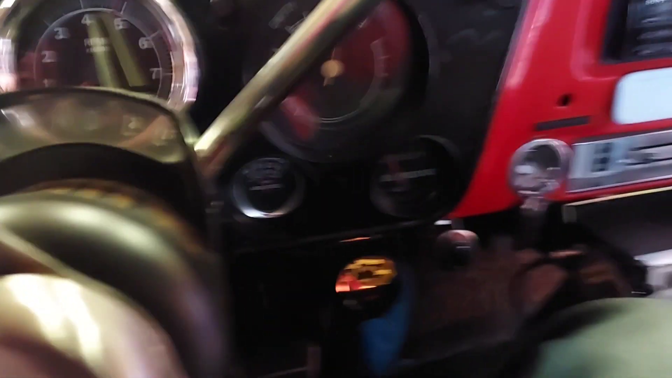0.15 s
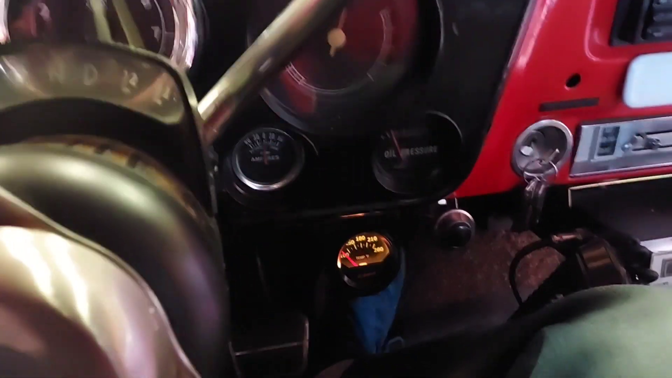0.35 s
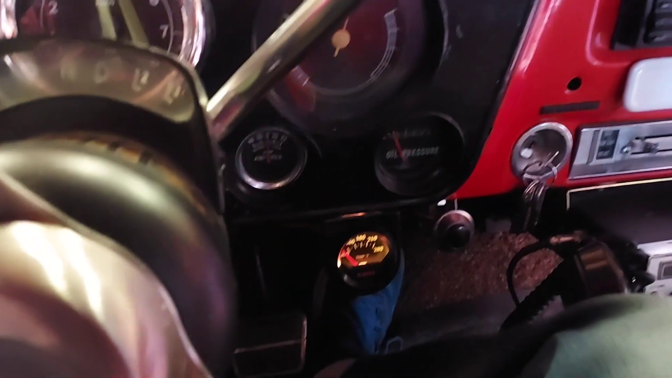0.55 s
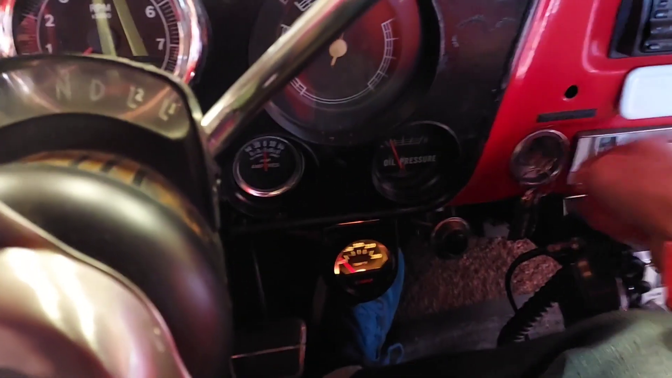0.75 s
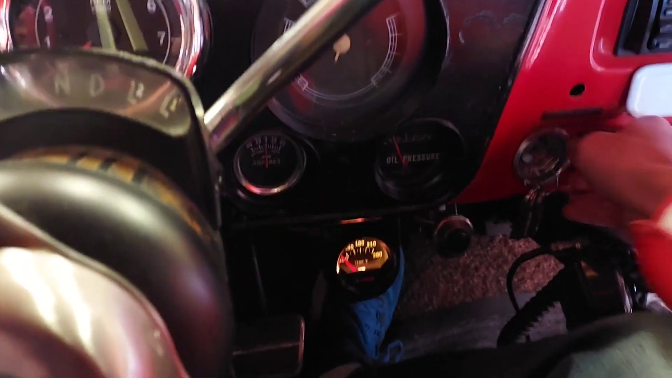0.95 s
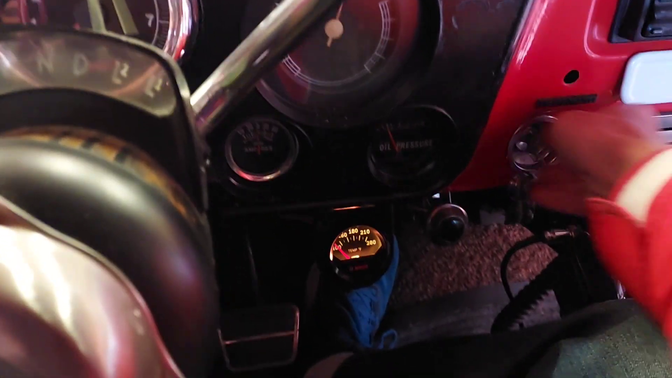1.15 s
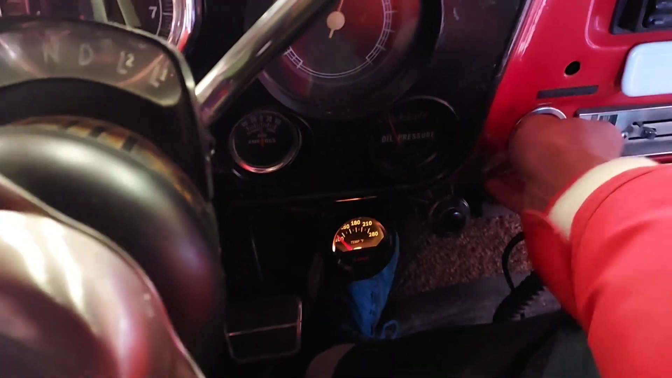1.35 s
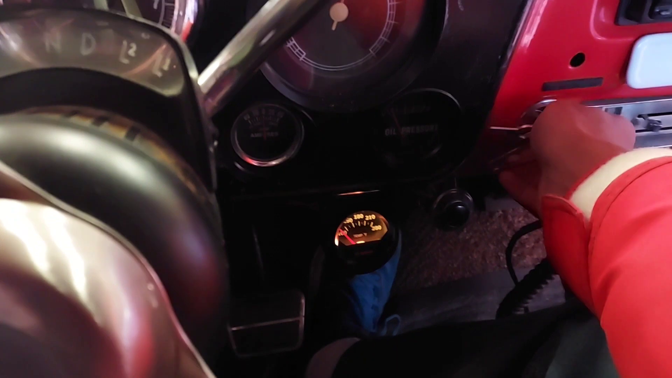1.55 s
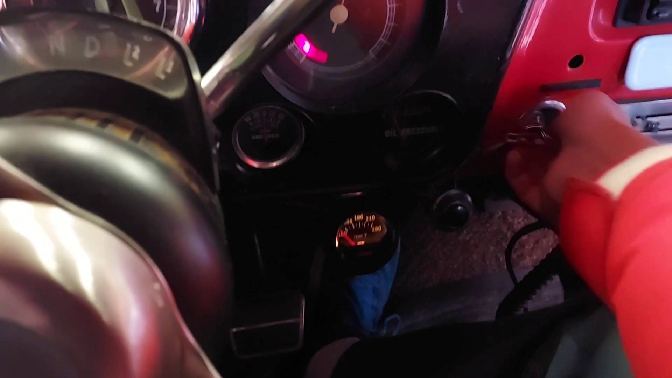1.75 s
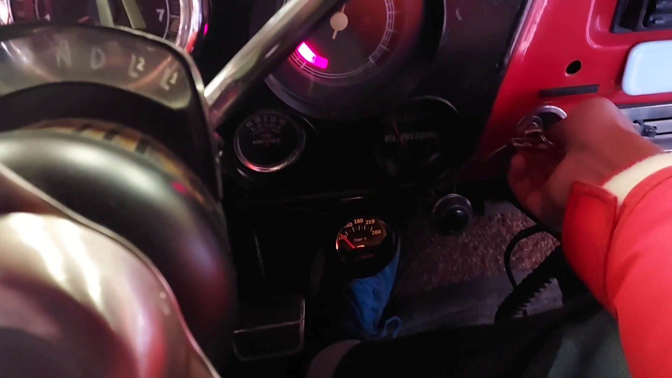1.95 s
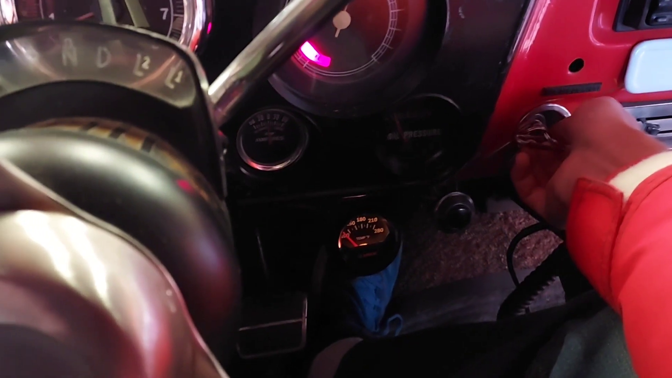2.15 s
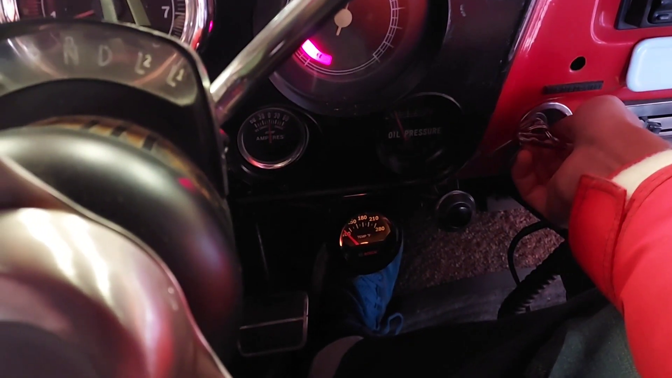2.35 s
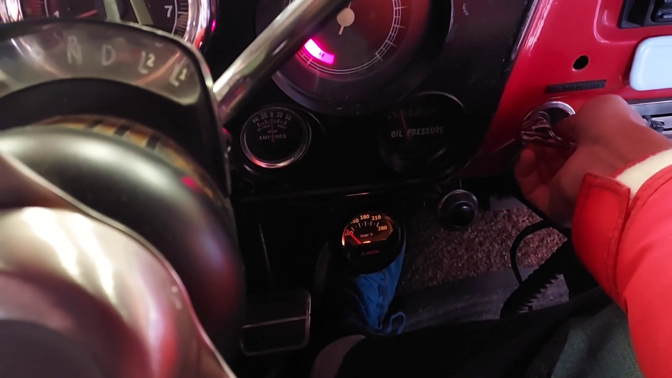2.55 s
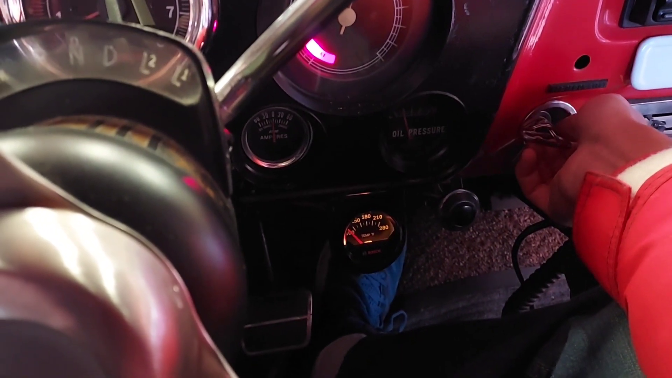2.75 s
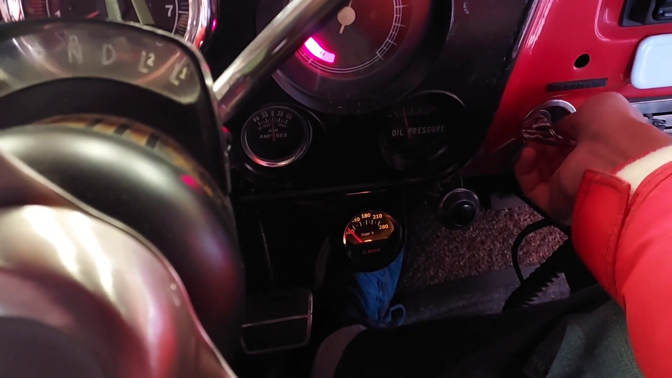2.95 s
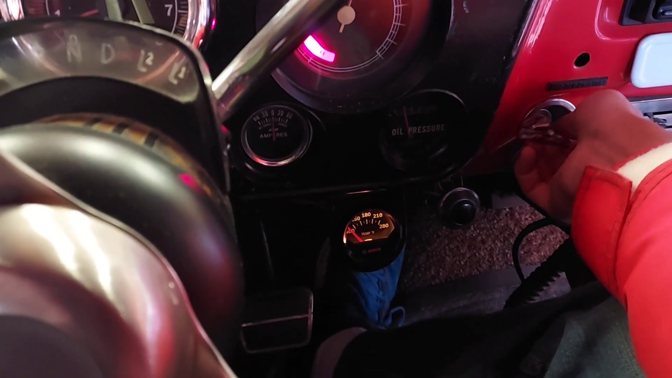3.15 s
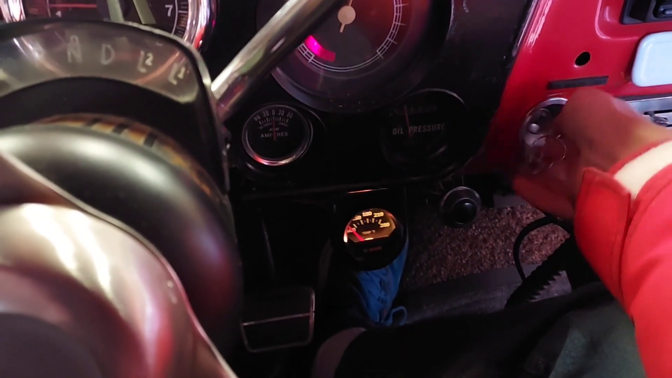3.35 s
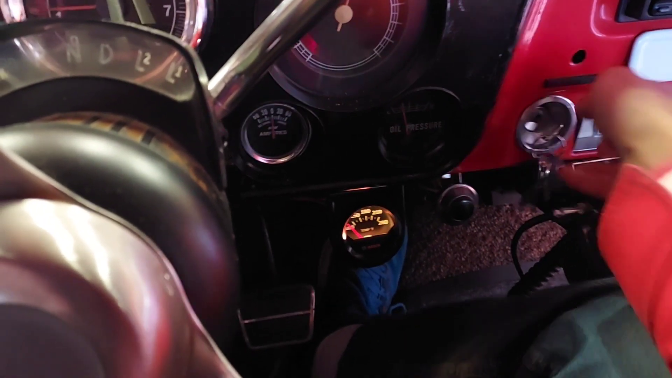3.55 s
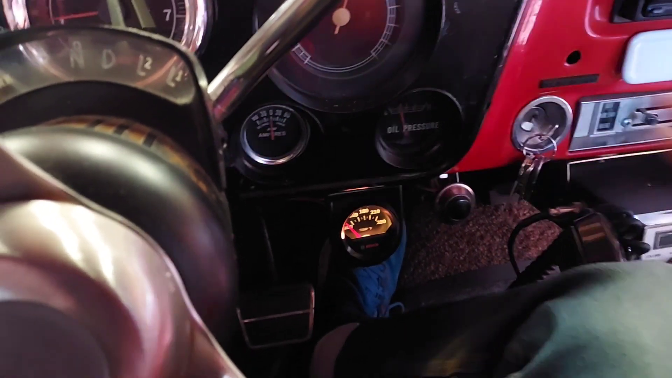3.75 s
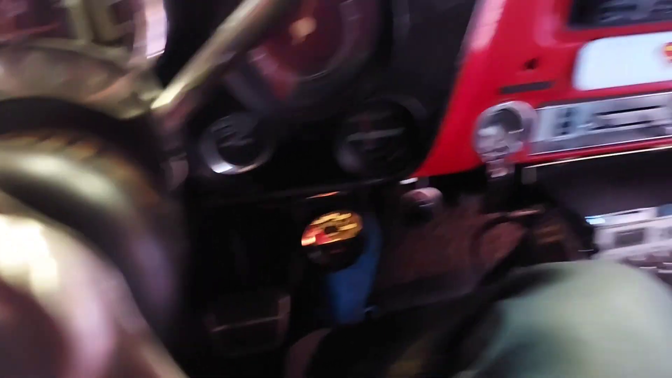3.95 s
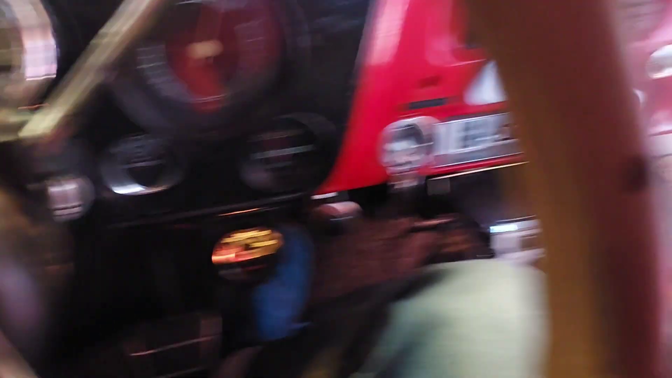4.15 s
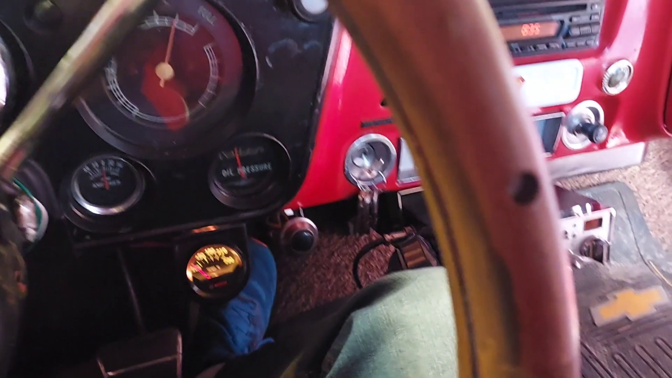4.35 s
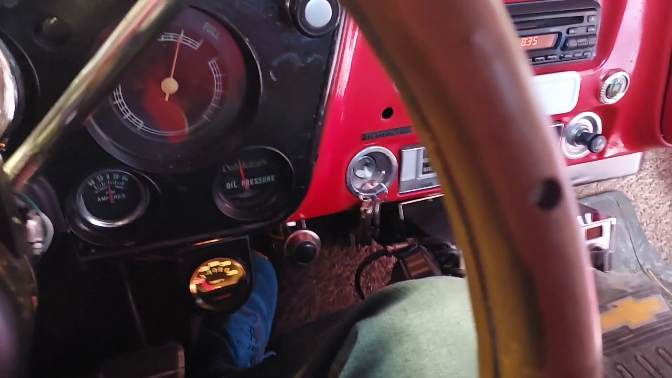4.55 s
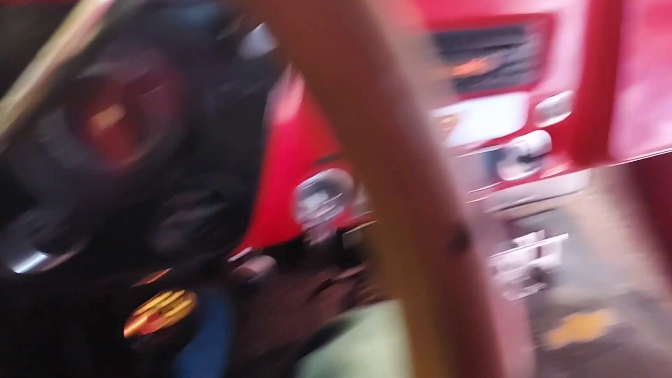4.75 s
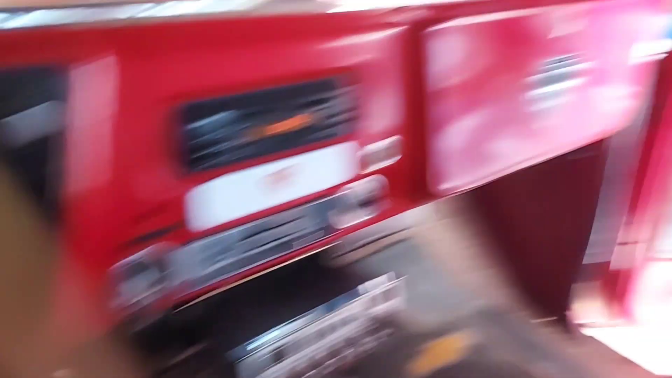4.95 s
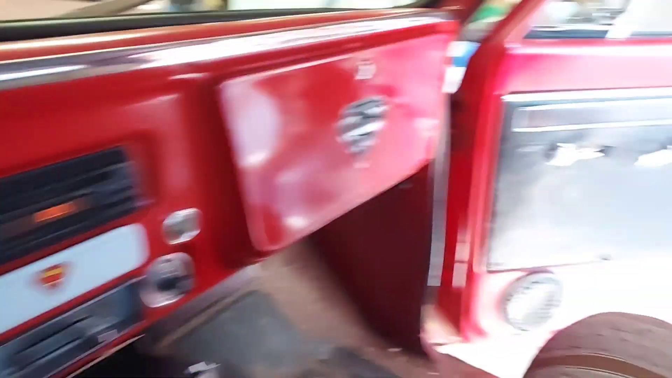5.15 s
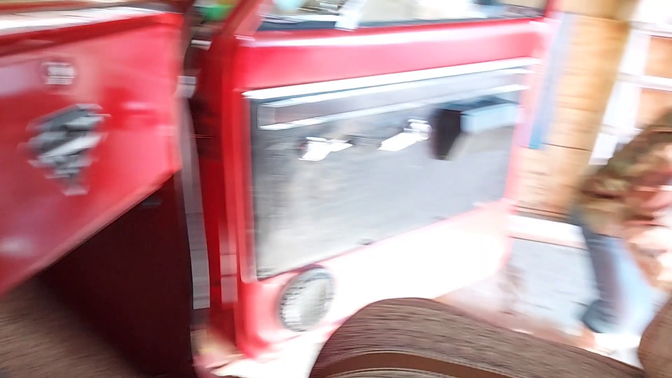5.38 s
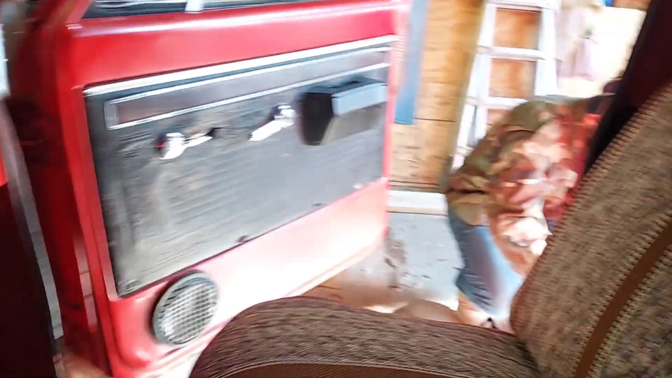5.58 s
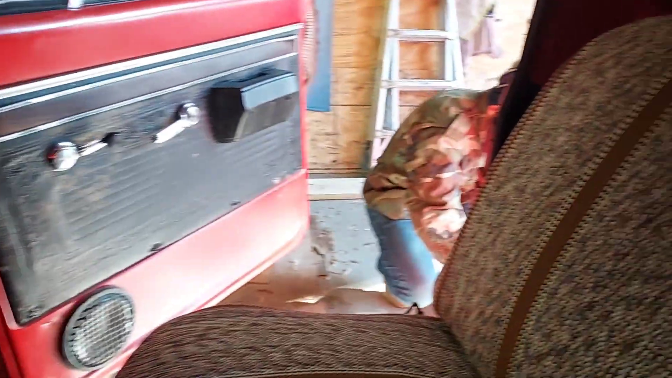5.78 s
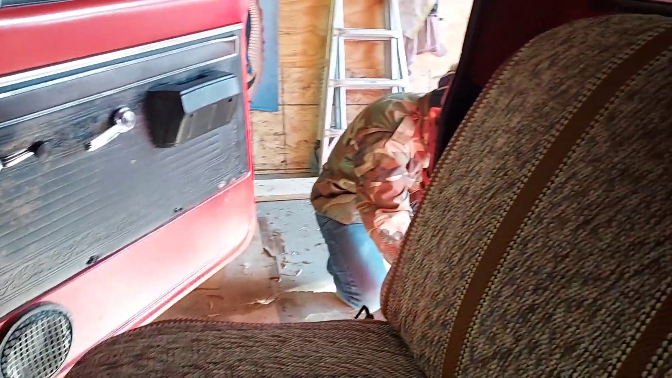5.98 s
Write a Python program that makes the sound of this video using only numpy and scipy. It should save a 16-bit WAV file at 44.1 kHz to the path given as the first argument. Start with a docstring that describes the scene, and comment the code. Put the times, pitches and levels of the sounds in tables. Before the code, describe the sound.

A driver shifts on the seat, cloth swishing, knuckles tapping trim and keys scraping. A starter engages with a knock and cranks in an unsteady grinding whine for under a second. The big engine puffs, fires and roars up with a rush of air, then drops quickly into an uneven, bass-heavy idle with clattering valve gear. Heard from the driver's seat, bass centred, bright noise wide left and right.

```python
"""Inside the cab of an old truck with a door open: cloth rustles, the seat thuds, keys scratch and jingle.
The starter whines and grinds as noise and unsteady sines; struck resonances knock as its pinion goes in.
Eight cylinders cough, catch, flare up and drop into a lumpy idle: each firing rings pipes and valve covers.
A phone with two ports hears it: the bass arrives shared, the treble nearly unrelated left and right."""
import sys
import numpy as np
from scipy import signal
from scipy.fft import rfft, irfft
from scipy.io import wavfile
from scipy.ndimage import uniform_filter1d

SR = 44100
rng = np.random.default_rng(int(sys.argv[2]) if len(sys.argv) > 2 else 0)


def master_out(mix):
    """Clip the mix to full scale and print it as 16-bit PCM to the path in sys.argv[1]."""
    frames = np.transpose(np.atleast_2d(mix))
    ceiling = np.clip(frames, -1, 1)
    pcm = np.round(ceiling * 32767).astype(np.int16)
    wavfile.write(sys.argv[1], SR, pcm)


N = 265482


def amp(db):
    """dB to gain."""
    return 10 ** (np.asarray(db, float) / 20)


def rms_one(x):
    """Scale to rms 1."""
    return x / np.sqrt(np.mean(x ** 2) + 1e-20)


def in_time(rows, silent=None):
    """Columns as straight lines in time; outside the rows they hold, or take a given value."""
    s, *columns = np.transpose(rows)
    return [np.interp(np.arange(N) / SR, s, column, silent, silent) for column in columns]


def clicks(s, sizes):
    """A train of single samples at the given moments."""
    at = np.round(np.asarray(s) * SR).astype(int)
    out = np.full(N, 1e-18)
    np.add.at(out, at[at < N], np.asarray(sizes)[at < N])
    return out


def ring(x, hz, t60):
    """A two-pole resonator: a unit click sets a sine of height 1 ringing, down 60 dB after t60 seconds."""
    r, w = amp(-60 / (t60 * SR)), 2 * np.pi * hz / SR
    return signal.lfilter([0, np.sin(w)], [1, -2 * r * np.cos(w), r * r], x)


def fade(x, t60):
    """Each click becomes a sudden rise that dies away by 60 dB in t60 seconds."""
    return signal.lfilter([1], [1, -amp(-60 / (t60 * SR))], x)


def peaks(hz, resonances):
    """Summed power of resonances (centre [Hz], width [Hz], level [dB]) over frequency."""
    return sum(amp(2 * db) / (1 + (2 * (hz - centre) / width) ** 2) for centre, width, db in resonances)


LEFT_LAG_S = 0.000455
SHARED = 0.073   # share of power common to both ports in the wide noises


def noise(spectrum=None, resonances=(), shared=0.83, graininess_db=0.):
    """Two-port noise, rms 1: a shared part reaches the left late, the rest is each port's own."""
    hz = np.arange(N // 2 + 1) * SR / N + 1
    white = rng.standard_normal((3, N)) * amp(graininess_db * rng.standard_normal(N))
    common, left, right = rfft(white)
    late = np.exp(-2j * np.pi * hz * LEFT_LAG_S)
    pair = np.sqrt(shared) * np.array([common * late, common])
    pair += np.sqrt(1 - shared) * np.array([left, right])
    if spectrum is None:
        # the power curve used as a gain counts every resonance twice: dark valleys
        return rms_one(irfft(pair * peaks(hz, resonances), N))
    corner_hz, corner_db = np.transpose(spectrum)
    colour = amp(np.interp(np.log(hz), np.log(corner_hz), corner_db))
    return rms_one(irfft(pair * colour * np.sqrt(1 + peaks(hz, resonances)), N))


def struck(events, modes, spread_db, rattle_s):
    """Each blow is a brief rattle that drives every mode with a strength of its own at each port."""
    s, db = np.transpose(events)[:2]
    luck = rng.standard_normal((len(s), 2, len(modes)))
    grit = rng.standard_normal((2, N))
    out = np.zeros((2, N))
    for k, (hz, level_db, t60) in enumerate(modes):
        for port in range(2):
            blows = clicks(s, amp(db + level_db + spread_db * luck[:, port, k]))
            out[port] += ring(grit[port] * fade(blows, rattle_s), hz, t60)
    return out / np.sqrt(rattle_s * SR / np.log(1e6))   # energy of one click


# bright colour of sleeve and keys: (frequency [Hz], relative level [dB per Hz])
SWISH_COLOUR = [(250, 0), (590, 1), (1000, 2.5), (5440, 3.5), (7790, -7.5), (14100, 7.5), (16000, 0)]


def swish_noise(graininess_db=0.):
    """Noise with the bright colour that cloth and key scratches share."""
    return noise(SWISH_COLOUR, shared=SHARED, graininess_db=graininess_db)


# the driver shifts on the seat:
# (time of the peak [s], rise [s], floor thud [dB], seat bump [dB], scuff [dB])
SEAT_SHIFTS = [(0.025, 0.1, -56, -55.5, -65), (0.317, 0.0061, -44.5, -41, -51),
               (0.71, 0.18, -80, -54, -50.5), (0.84, 0.1, -43.5, -48, -45.5),
               (0.955, 0.015, -45.5, -53, -57), (1.2, 0.046, -46, -50, -54), (1.3, 0.043, -55, -67, -37.5),
               (1.382, 0.061, -58, -59, -50), (1.5, 0.045, -47, -56.5, -76)]
SHIFT_RISE_DB, SHIFT_FALL_DB_PER_S = 10, 149
# floor and seat resonances: (centre [Hz], width before the doubling [Hz], half the peak level [dB])
FLOOR_THUD = [(53.6, 11, 0)]
SEAT_BUMP = [(117, 75, 0)]
# dull scrape of the seat: (frequency [Hz], relative level [dB per Hz])
SCUFF_COLOUR = [(88, -25), (150, -7.5), (481, -8), (1180, -12.5), (2500, -24.5), (3250, -47), (5500, -120)]
# sleeve hiss: (time [s], level [dB])
SLEEVE_LEVEL = [(0.0, -59.5), (0.27, -68), (0.31, -55), (0.48, -49), (0.64, -51), (0.836, -45.5),
                (1.142, -50), (1.215, -39), (1.222, -30.5), (1.484, -46), (1.698, -52.5), (1.8, -38),
                (1.95, -57.5)]
# knuckle on trim: (time [s], level [dB], pitch [Hz])
KNUCKLE_TAPS = [(0.683, -40, 376), (0.708, -47, 560), (0.746, -37, 490), (0.797, -33.5, 400),
                (0.828, -34, 485), (0.839, -24, 229), (1.033, -35, 596), (1.216, -28, 533),
                (1.23, -27.5, 544), (1.244, -31.5, 554), (1.29, -27.5, 960), (1.36, -35.5, 540)]
# partials of one tap: (multiple of its pitch, signed size)
TAP_PARTIALS = ((1, 1), (1.3, -.6), (1.75, .3))
TAP_T60_S = 0.04


def driver():
    """Friction noise swishes and scuffs, low resonant noise bumps, a knuckle rings short partials."""
    t = np.arange(N) / SR
    thud, bump, scuff = np.zeros((3, N))
    for s, rise, thud_db, bump_db, scuff_db in SEAT_SHIFTS:
        swell = amp(np.where(t < s, SHIFT_RISE_DB * (t - s) / rise, SHIFT_FALL_DB_PER_S * (s - t)))
        thud += amp(thud_db) * swell
        bump += amp(bump_db) * swell
        scuff += amp(scuff_db) * swell
    out = thud * noise(None, FLOOR_THUD) + bump * noise(None, SEAT_BUMP)
    out += amp(in_time(SLEEVE_LEVEL)[0]) * swish_noise()
    out += scuff * noise(SCUFF_COLOUR, shared=0.58, graininess_db=11.5)
    for s, db, hz in KNUCKLE_TAPS:
        tap = clicks([s], [amp(db)])
        partials = sum(size * ring(tap, hz * ratio, TAP_T60_S) for ratio, size in TAP_PARTIALS)
        out += partials * [[1], [.5]]   # half as strong on the right
    return out


# keys touch each other and the lock: (time [s], relative level [dB], colour [Hz])
KEY_SCRATCHES = [(0.3236, -42, 4220), (1.2192, -27, 14400), (1.273, -23, 15500), (1.2852, -26, 14300),
                 (1.2936, -21.5, 2830), (1.321, -25, 1610), (1.371, -30.5, 13800), (1.382, -35, 14200),
                 (1.486, -32, 4930), (1.5103, -24.5, 3200), (1.529, -23.5, 4380), (1.543, -52, 13500),
                 (1.5787, -28.5, 3550), (1.616, -34, 6500), (1.7333, -31.5, 5600), (1.7986, -20, 2610),
                 (3.552, -28, 2630)]
# now and then a key hangs free and rings on: (time [s], level [dB])
FREE_KEYS = [(1.218, -26), (1.293, -26), (1.431, -31), (1.527, -33)]
# ringing modes of a key: (frequency [Hz], relative level [dB], t60 [s])
KEY_MODES = [(6760, -15, 0.12), (13570, -2, 0.11), (14850, -10, 0.06), (15680, 2, 0.1)]
SCRATCH_T60_S = 0.08
CRACK_DB, CRACK_T60_S = -9, 0.012   # the first instant of each touch


def keys():
    """Each touch is a crack and a short coloured scratch; a free key rings its metal modes on."""
    out = struck(FREE_KEYS, KEY_MODES, spread_db=3.5, rattle_s=0.007)
    swish = swish_noise(graininess_db=1.0)
    touch_s, touch_db = np.transpose(KEY_SCRATCHES)[:2]
    out += fade(clicks(touch_s, amp(touch_db + CRACK_DB)), CRACK_T60_S) * swish
    white = rng.standard_normal((2, N))
    n = np.arange(round(SCRATCH_T60_S * SR))
    for s, db, hz in KEY_SCRATCHES:
        at = round(s * SR) + n
        edges = np.clip([hz / 1.137, hz * 1.05], 200, 18000)
        band = signal.butter(1, edges, "band", fs=SR, output="sos")
        tinted = signal.sosfilt(band, white[:, at])
        out[:, at] += amp(db - 6.5 - 60 * n / len(n)) * (swish[:, at] + 4.8 * tinted)
    return out


# block and manifold noise: (frequency [Hz], relative level [dB per Hz])
ROAR_COLOUR = [(150, -59), (250, -6.5), (354, -15.5), (690, -15), (775, -19), (1420, -27.5), (2140, -31.5),
               (5330, -18), (8000, -30.5), (10400, -65), (17600, -120)]
# sheet metal standing out of it: (centre [Hz], width [Hz], level [dB])
SHEET_METAL = [(1780, 1020, 11), (2326, 17, 14), (2524, 13, 18.5)]


def block_roar(graininess_db=0.):
    """Broad metal noise, coloured by block, manifold and the resonances of sheet metal."""
    return noise(ROAR_COLOUR, SHEET_METAL, SHARED, graininess_db)


# starter noise: (time [s], body hum [dB], gear noise [dB])
STARTER_LEVEL = [(1.77, -39, -52), (1.794, -40, -45), (1.822, -18, -34.5), (1.874, -26, -38),
                 (2.232, -30.5, -44), (2.464, -31.5, -34.5), (2.55, -36, -40.5), (2.66, -21, -35.5),
                 (2.9, -27, -46.5)]
# gear noise colour: (frequency [Hz], relative level [dB per Hz])
GEAR_COLOUR = [(120, -33), (200, -23), (488, -3.5), (660, -1), (1350, -5.5), (2150, -1.5), (6140, -12),
               (9000, -42), (11700, -81)]
# body shaken by the starter: (centre [Hz], width before the doubling [Hz], half the peak level [dB])
BODY_HUM = [(57.6, 48, 4.5), (97, 29, 2.5), (166, 93, -5.5), (254, 28, -5)]
# gear whine, rising with the crank and sagging at each compression:
# (time [s], mean pitch [Hz], relative level [dB])
GEAR_WHINE = [(1.82, 280.4, -41), (1.93, 324, -47), (2.18, 342.3, -34), (2.24, 406.4, -37.5),
              (2.32, 361.6, -39.5), (2.41, 430.6, -55), (2.51, 394, -40.5), (2.58, 490, -56)]
# whine partials: (multiple of the pitch, relative level [dB])
WHINE_PARTIALS = [(1, -7), (2, -5)]
# the starter whines while it is engaged
ENGAGE_S, RELEASE_S, WHINE_EDGE_S = 1.8, 2.62, .1
# pinion knocks on the ring gear: (time [s], relative level [dB])
PINION_KNOCKS = [(1.7843, -15.5), (2.6258, -16.5), (2.9497, -16), (3.0133, -10), (3.0414, -21), (3.09, -27),
                 (3.143, -17.5), (3.176, -25), (3.246, -18), (3.2846, -17)]
# housing modes they excite: (frequency [Hz], relative level [dB], t60 [s])
HOUSING_MODES = [(1005, -7.5, 0.05), (1650, -6, 0.03), (2170, -10, 0.02), (2500, -0.5, 0.02),
                 (5250, 6, 0.008), (6070, 2.5, 0.008)]
KNOCK_RATTLE_S = 0.1
CLANK_S, CLANK_HZ, CLANK_DB = 2.622, 1655, -45   # the first firing kicks the pinion


def starter():
    """Meshing gears whine as unsteady sines and grind as noise; the body hums, the pinion knocks."""
    t = np.arange(N) / SR
    whine_hz, whine_db = in_time(GEAR_WHINE)
    engaged = np.clip(np.minimum(t - ENGAGE_S, RELEASE_S - t) / WHINE_EDGE_S, 0, 1)
    wobble = rms_one(signal.lfilter([1], [1, -.99], rng.standard_normal(N)))
    phase = 2 * np.pi * np.cumsum(whine_hz * (1 + .07 * wobble)) / SR
    whine = np.zeros(N)
    for multiple, db in WHINE_PARTIALS:
        # the mesh stutters: every partial comes and goes by itself
        stutter = .6 + rms_one(fade(fade(rng.standard_normal(N), .03), .03))
        whine += engaged * amp(whine_db + db) * stutter * np.sin(multiple * phase)
    hum_db, gear_db = in_time(STARTER_LEVEL, -120)
    teeth = [(1654, 21, 11.2), (2130, 18, 7.5), (2656, 14, 9.1)]   # (centre [Hz], width [Hz], level [dB])
    grind = amp(gear_db) * noise(GEAR_COLOUR, teeth, SHARED, graininess_db=4.5)
    hum = amp(hum_db) * noise(None, BODY_HUM)
    s, db = np.transpose(PINION_KNOCKS)
    crash = fade(clicks(s, amp(db - 27.5)), 0.89) * block_roar()
    knocks = amp(-10.5) * struck(PINION_KNOCKS, HOUSING_MODES, spread_db=6.0, rattle_s=KNOCK_RATTLE_S)
    kick = fade(clicks([CLANK_S], [amp(CLANK_DB)]), 0.3) * rng.standard_normal((2, N))
    clank = ring(kick, CLANK_HZ, 0.04)
    return clank + whine + grind + hum + crash + knocks


# crank speed, from the start of a four-stroke cycle: (time [s], speed [rpm])
CRANK_SPEED = [(2.28, 531.4), (2.813, 473.9), (3.366, 1051.9), (3.5, 850.9), (3.62, 556.4), (3.9, 559.2),
               (4.17, 541.9), (4.32, 497.6), (4.55, 517.9), (5.1, 531.0), (5.4, 531.6), (5.75, 541.5)]


def crank_cycles():
    """Four-stroke cycles (two turns each) gone by at every sample."""
    running = np.arange(N) >= CRANK_SPEED[0][0] * SR
    return np.cumsum(running * in_time(CRANK_SPEED)[0]) / (120 * SR)


# level of the 200-260 Hz boom and of two high idle tones: (time [s], level [dB])
HIGH_BOOM_LEVEL = [(2.5, -52), (3.3, -4), (4.8, -9), (5.2, 1), (6, 0.5)]


def high_boom_gain():
    """Gain of the upper boom and of the two idle tones that move with it."""
    return amp(in_time(HIGH_BOOM_LEVEL)[0])


# level of the steady idle tones: (time [s], level [dB])
TONE_LEVEL = [(3.4, -5), (3.8, -4.5), (4.1, -1.5), (4.5, 3), (6.1, -3)]


def tone_gain():
    """Gain of the steady idle tones."""
    return amp(in_time(TONE_LEVEL, -120)[0])


# cylinders in firing order:
# (exhaust pulse [dB], mean lateness [ms], valve puff [dB], tappet tick [dB]), all levels relative
CYLINDERS_IN_ORDER = [(-4, -1.2, -3.5, 0), (0.5, 0.82, -7, -9), (-6, 0.32, -4.5, -4),
                      (0.6, 0.075, -6.5, -9), (-9, 1, -4, -4), (-21, -3.4, -7, -12), (-2.5, 0.95, -9, -2),
                      (0, -1.68, -8, -21)]


def firings(cycles):
    """Moments of the firings, eight in a cycle, and the four table columns for each."""
    s = (np.flatnonzero(np.diff(np.floor(8 * cycles))) + 1) / SR
    return s, np.transpose(CYLINDERS_IN_ORDER)[:, np.arange(1, len(s) + 1) % 8]


# pipes and cab booming: (frequency [Hz], relative level [dB], t60 [s])
PIPE_MODES = [(45.1, -1, 0.36), (61.3, 3.2, 0.15), (66.86, 1, 0.22), (94.4, -6, 0.23), (119.9, -12.5, 0.41),
              (143.8, -16.5, 0.3), (213.56, -18, 0.7), (243.7, -18.5, 0.52)]
# strength of the exhaust beat: (time [s], level [dB])
EXHAUST_LEVEL = [(2.56, -35), (2.75, -25.5), (2.96, -18.5), (3.29, -8.5), (3.53, -17), (4.2, -12),
                 (4.74, -10.5), (6.1, -12.5)]
# uneven burning heard through the floor: (centre [Hz], width before the doubling [Hz], half the level [dB])
FLOOR_RUMBLE = [(68, 43, -9.5), (165, 40, -8.5), (224, 125, -5.5), (347, 590, -15)]
RUMBLE_DB = -23   # against the exhaust beat


def exhaust(firing_s, pulse_db, late_ms):
    """Every firing thumps the pipe and cab modes; noise through the floor adds the rumble."""
    exhaust_gain = amp(in_time(EXHAUST_LEVEL, -120)[0])
    # cold cylinders burn unevenly: strength and timing scatter
    luck = rng.standard_normal((2, len(firing_s)))
    pulses = clicks(firing_s + (late_ms + .4 * luck[0]) / 1000, amp(pulse_db + 1.5 * luck[1]))

    def boom_of(modes):
        """Modes ring from the same pulses with alternating sign."""
        return sum((-1) ** k * amp(db) * ring(pulses, hz, t60) for k, (hz, db, t60) in enumerate(modes))

    band = signal.butter(4, [38, 420], "band", fs=SR, output="sos")
    boom = signal.sosfilt(band, boom_of(PIPE_MODES[:6]) + high_boom_gain() * boom_of(PIPE_MODES[6:]))
    # strength follows the level table, not the pulse rate
    boom /= np.sqrt(uniform_filter1d(boom ** 2, size=SR // 2) + 1e-9)
    # even burning turns thumps into tones
    boom *= exhaust_gain * (1 - .6 * np.clip(tone_gain(), 0, 1))
    return boom + exhaust_gain * amp(RUMBLE_DB) * noise(None, FLOOR_RUMBLE, 0.69)


# the first turns of the crank cough out air one by one: (time [s], relative level [dB])
AIR_COUGHS = [(2.62, -37.5), (2.75, -29), (2.865, -41)]
COUGH_T60_S, COUGH_ROAR_DB = 0.19, -5


def coughs():
    """Envelope of the coughs: an 8 ms rise, then a decay."""
    s, db = np.transpose(AIR_COUGHS)
    return uniform_filter1d(fade(clicks(s, amp(db)), COUGH_T60_S), size=350)


# throttle opens for the start, shuts as the revs fall, rests at idle:
# (time [s], level of the air drawn over idle [dB])
THROTTLE_AIR = [(2.6, -1), (2.85, 7.5), (2.9, 14.5), (3.3, 15.5), (3.52, -14), (3.6, 1.5), (4.35, -2),
                (4.5, 1), (6.1, 2)]
# wandering delay of the ticks and puffs: (time [s], delay [ms])
VALVE_DELAY = [(3.62, 7), (3.83, 17), (4.27, 5), (5.42, 18), (5.9, 15)]
# valve gear ticking in its covers: (frequency [Hz], relative level [dB], t60 [s])
COVER_MODES = [(1700, -6, 0.02), (2130, -2, 0.02), (2520, 0, 0.012), (5250, -4, 0.012), (6100, -8, 0.008)]
IDLE_HISS_DB, IDLE_CLATTER_DB = -49.5, -45
CLATTER_FOLLOWS = 0.5   # share of the throttle's swing
TICKS_DB = 9   # against the clatter
SPIT_DB, SPIT_T60_S = 10, 0.0059   # a bright spit of air once a turn, against the hiss


def valve_gear(firing_s, puff_db, tick_db, roar, air):
    """For every firing a puff swells roar and hiss, a valve seats and a tappet ticks in the covers."""
    throttle_db = in_time(THROTTLE_AIR, -120)[0]
    clatter_gain = amp(IDLE_CLATTER_DB + CLATTER_FOLLOWS * throttle_db)
    luck = rng.standard_normal((3, len(firing_s)))
    valve_s = firing_s + np.interp(firing_s, *np.transpose(VALVE_DELAY)) / 1000
    puffs = 0.08 + fade(fade(clicks(valve_s, amp(puff_db + 3 * luck[0])), 0.2), 0.03) / 65
    puffs /= np.sqrt(uniform_filter1d(puffs ** 2, size=SR // 3))   # even out the level
    tick_s = valve_s + .011 + .0015 * luck[1]
    blows = np.c_[np.r_[valve_s, tick_s], np.r_[puff_db, tick_db]]
    ticks = clatter_gain * amp(TICKS_DB) * struck(blows, COVER_MODES, spread_db=4, rattle_s=.045)
    spits = fade(clicks(valve_s[3::4], amp(SPIT_DB + 2 * luck[2, 3::4])), SPIT_T60_S)
    spits *= np.arange(N) > VALVE_DELAY[0][0] * SR   # only once idling
    cough = coughs()
    hiss = (amp(IDLE_HISS_DB + throttle_db) * (puffs + spits) + cough) * air
    clatter = (clatter_gain * puffs + amp(COUGH_ROAR_DB) * cough) * roar
    return clatter + ticks + hiss


# first catches: a few strong firings in a row make the cab boom
# (time [s], length [s], pitch [Hz], peak level [dB])
CAB_CATCHES = [(2.694, 0.16, 47.3, -13), (2.934, 0.11, 58, -8), (3.069, 0.063, 50.1, -3),
               (3.135, 0.06, 67, -4.5)]


def catches():
    """Swelling and fading sines at the cab's low resonance."""
    out = np.zeros(N)
    for s, length, hz, db in CAB_CATCHES:
        t = np.arange(round(length * SR)) / SR
        swell = np.sin(np.pi * t / length) ** .5
        out[round(s * SR):][:len(t)] += amp(db) * swell * np.sin(2 * np.pi * hz * t)
    return out


# steady tones of the idle: (multiple of the cycle rate, relative level [dB])
IDLE_ORDERS = [(10, -33), (11, -78), (13, -32), (14, -34), (15, -40), (16, -22), (22, -32.5), (26, -28)]
# a tone that sings when the idle runs fast
SURGE_MULTIPLE, SURGE_DB, SURGE_RPM, SURGE_DB_PER_RPM = 32, -34.5, 536.5, 0.59
HIGH_MULTIPLE, HIGH_TONE_DB = 48, -39   # the highest idle tone


def idle_tones(cycles):
    """Even burning sounds as cosines locked to multiples of the four-stroke cycle."""
    angle = 2 * np.pi * cycles
    steady, high_boom = tone_gain(), high_boom_gain()
    tones = np.zeros(N)
    for multiple, db in IDLE_ORDERS:
        # the pipes delay each tone differently, so their crests do not pile up
        tones += amp(db) * steady * np.cos(multiple * (angle - .7 + .11 * multiple))
    fast_rpm = np.clip(in_time(CRANK_SPEED)[0] - SURGE_RPM, -40, 25)
    surging = np.arange(N) > TONE_LEVEL[1][0] * SR   # from the second row on
    surge_gain = surging * amp(SURGE_DB + SURGE_DB_PER_RPM * fast_rpm) * high_boom
    tones += surge_gain * np.cos(SURGE_MULTIPLE * angle)
    tones += amp(HIGH_TONE_DB) * steady * high_boom * np.cos(HIGH_MULTIPLE * angle)
    return tones


# the loudest clacks of the idle, one on most crank turns: (time [s], relative level [dB], colour [Hz])
IDLE_CLACKS = [(3.618, -33.5, 1720), (3.7197, -35.5, 2380), (3.829, -33, 5500), (3.9387, -31, 2360),
               (4.0474, -35, 1720), (4.1505, -30, 1800), (4.19, -33.5, 2200), (4.263, -31.5, 1740),
               (4.3974, -53, 1670), (4.5123, -31.5, 5310), (4.6272, -29.5, 1900), (4.7453, -33, 1830),
               (4.846, -26.5, 2190), (4.9644, -37, 2500), (5.0777, -28.5, 2330), (5.195, -34.5, 1620),
               (5.3057, -32.5, 2080), (5.416, -30.5, 1660), (5.6426, -29.5, 2070), (5.7533, -30, 2820),
               (5.5324, -39, 2230), (5.864, -32, 2300), (5.978, -38, 1810)]
CLACK_T60_S, CLACK_RISE_S = .1, .003
CLACK_RING_DB, CLACK_ROAR_DB, CLACK_AIR_DB = -6.5, -8.5, -19.5


def clacks(roar, air):
    """Each clack is a burst of block noise and air with a rattling ring of its own colour."""
    s, db, hz = np.transpose(IDLE_CLACKS)
    hits = fade(clicks(s + CLACK_RISE_S / 2, amp(db)), CLACK_T60_S)
    bursts = uniform_filter1d(hits, size=round(CLACK_RISE_S * SR))
    out = bursts * (amp(CLACK_ROAR_DB) * roar + amp(CLACK_AIR_DB) * air)
    out = np.pad(out, ((0, 0), (0, SR)))   # room for the last ring
    n, white = np.arange(round(CLACK_T60_S * SR)), rng.standard_normal((2, N + SR))
    for start, level_db, colour_hz in zip(np.round(s * SR).astype(int), db, hz):
        rattle = rms_one(ring(white[:, start + n], colour_hz, 0.02))
        out[:, start + n] += amp(level_db + CLACK_RING_DB - 60 * n / len(n)) * rattle
    return out[:, :N]


# air and belts: (frequency [Hz], relative level [dB per Hz])
AIR_COLOUR = [(4410, 29), (7500, -14), (9100, 27), (9940, 30.5), (15700, 36.5), (16500, -32.5)]


def engine():
    """One crank clock drives exhaust, valve gear and tones; clacks share the roar and the air."""
    cycles = crank_cycles()
    firing_s, (pulse_db, late_ms, puff_db, tick_db) = firings(cycles)
    roar = block_roar(graininess_db=2.0)
    air = noise(AIR_COLOUR, shared=SHARED)
    out = exhaust(firing_s, pulse_db, late_ms) + valve_gear(firing_s, puff_db, tick_db, roar, air)
    return out + catches() + idle_tones(cycles) + clacks(roar, air)


def scene():
    """All sources at the two ports."""
    return driver() + keys() + starter() + engine()


LEFT_BASS_CUT_HZ, LEFT_DB = 58, -2.5
MIC_TOP_HZ, CUTOFF_HZ = 15800, 17167
# a standing wave delays the left port until the phone turns
CAB_HZ, CAB_WIDTH_HZ, TURN_S, TURN_LENGTH_S = 250.5, 33.3, 4.64, 0.5


def record(dry):
    """An all-pass delays the left, which is quieter and loses bass; peaks are rounded, the top is cut."""
    r = np.exp(-np.pi * CAB_WIDTH_HZ / SR)
    poles = [1, -2 * r * np.cos(2 * np.pi * CAB_HZ / SR), r * r]
    turned = np.clip((np.arange(N) / SR - TURN_S) / TURN_LENGTH_S, 0, 1)
    left = turned * dry[0] + (1 - turned) * signal.lfilter(poles[::-1], poles, dry[0])
    left = amp(LEFT_DB) * signal.lfilter(*signal.butter(1, LEFT_BASS_CUT_HZ, "high", fs=SR), left)
    both = np.tanh(np.array([left, dry[1]]) * amp(3.5))
    both = signal.sosfilt(signal.ellip(8, .5, 45, MIC_TOP_HZ, fs=SR, output="sos"), both)
    return signal.sosfilt(signal.cheby2(12, 70, CUTOFF_HZ, fs=SR, output="sos"), both)


dry = scene()
out = record(dry)
master_out(out)
```